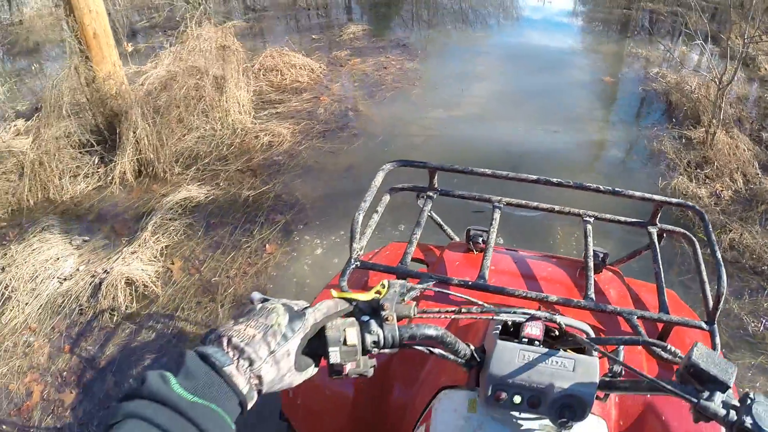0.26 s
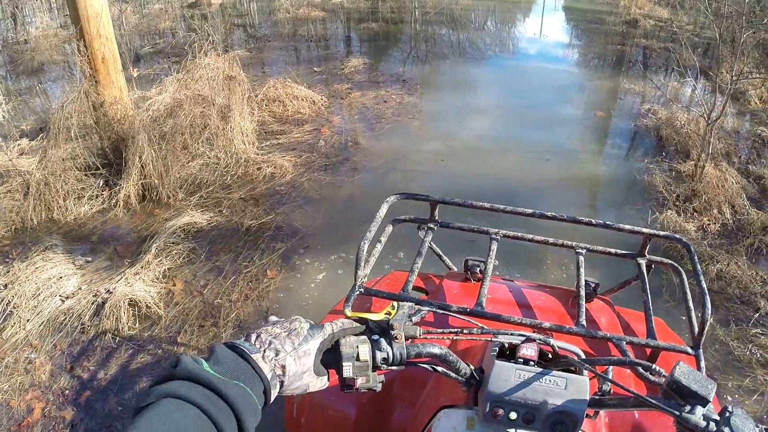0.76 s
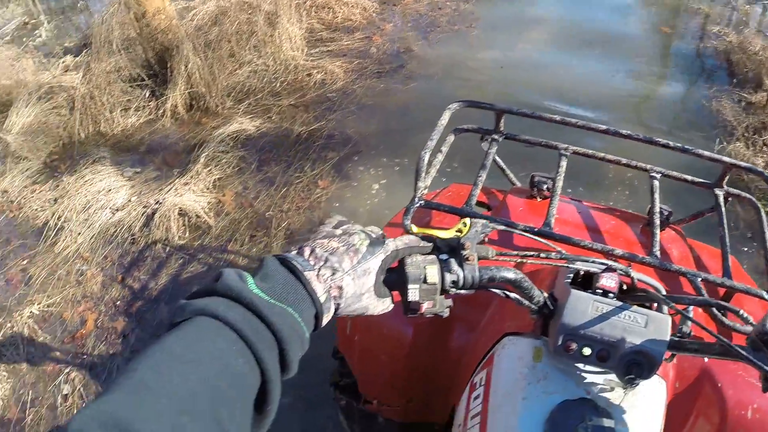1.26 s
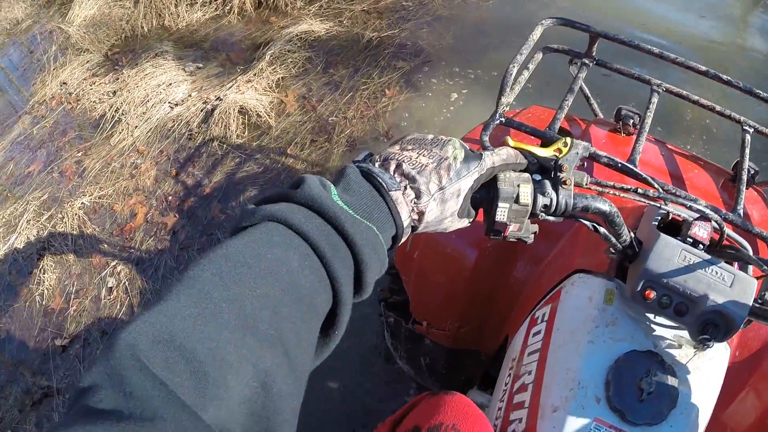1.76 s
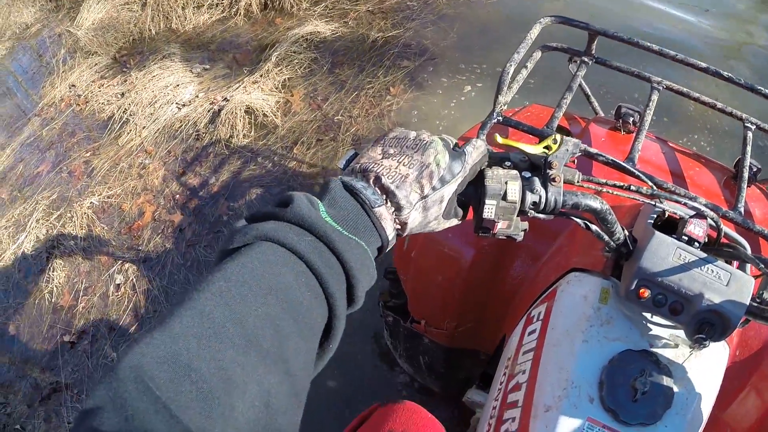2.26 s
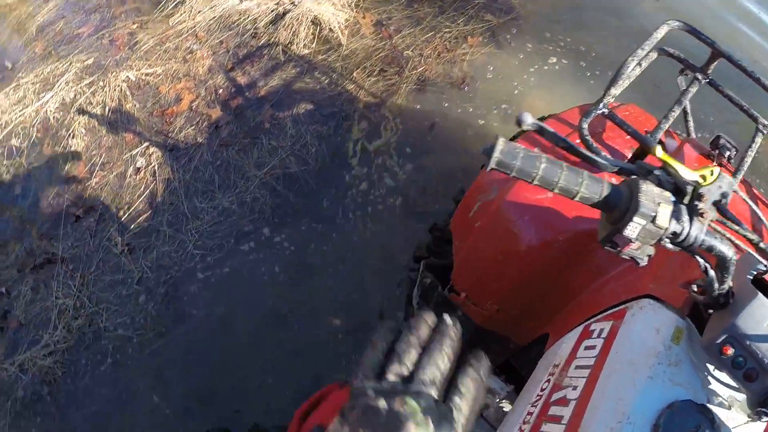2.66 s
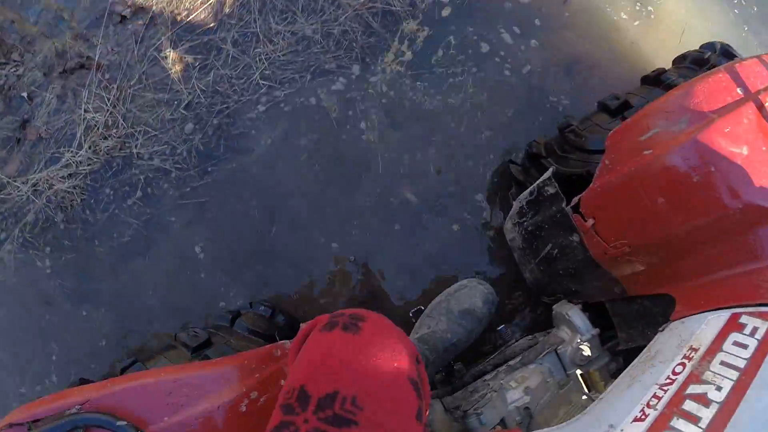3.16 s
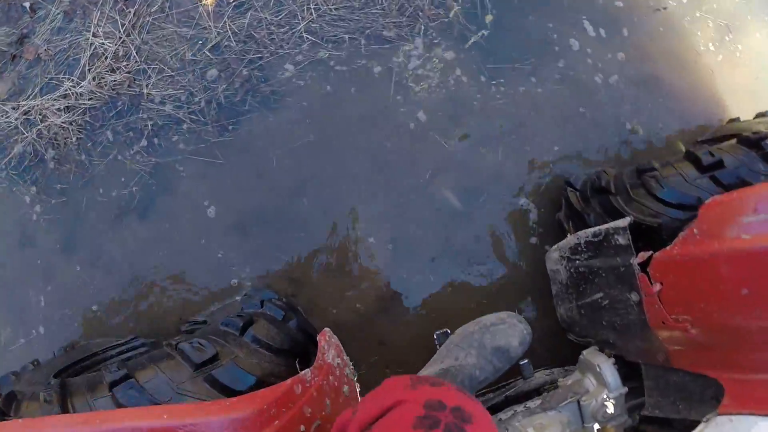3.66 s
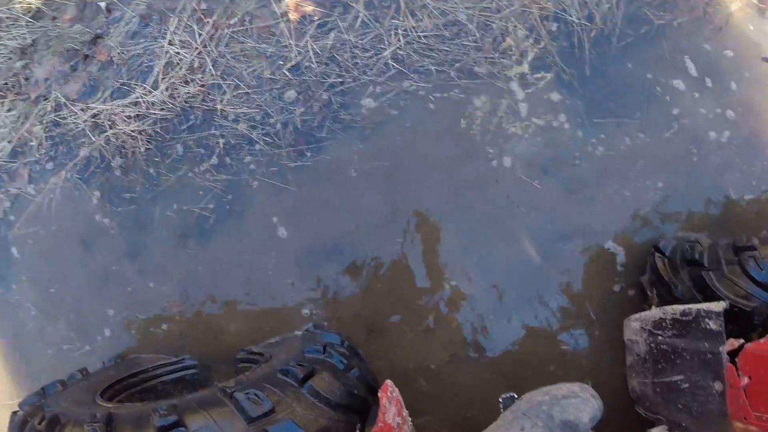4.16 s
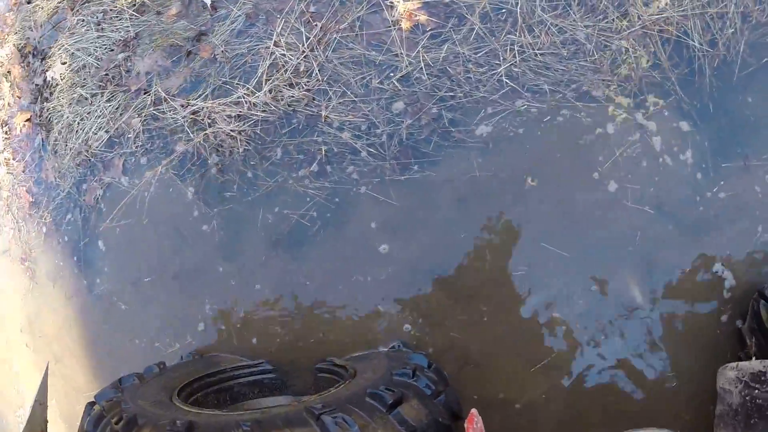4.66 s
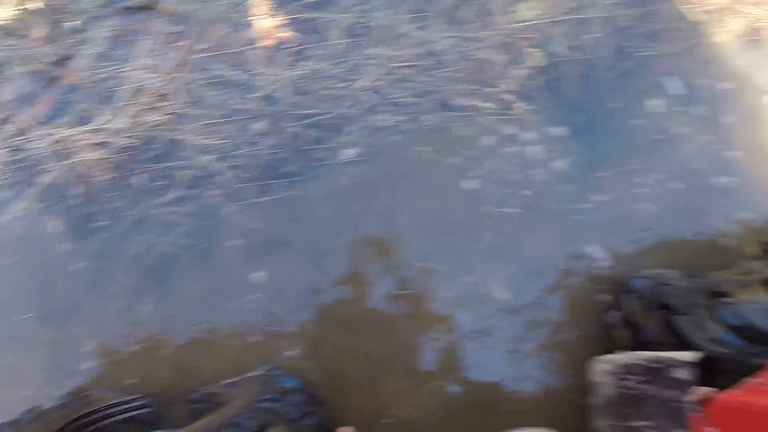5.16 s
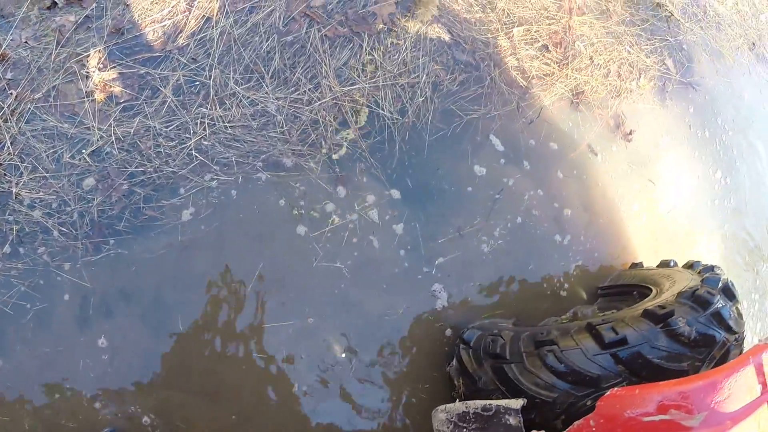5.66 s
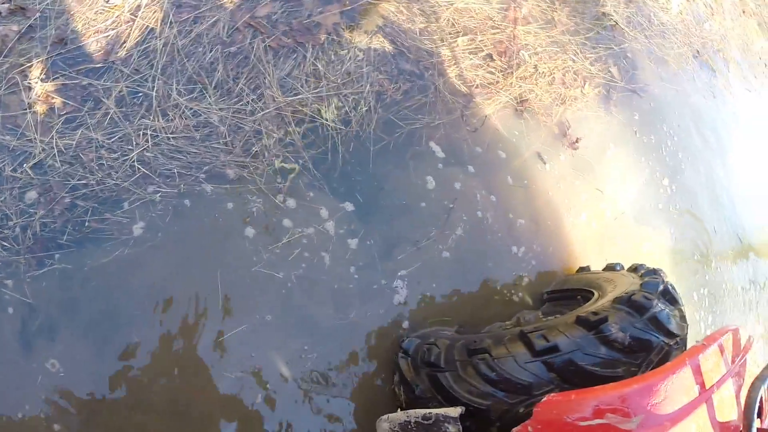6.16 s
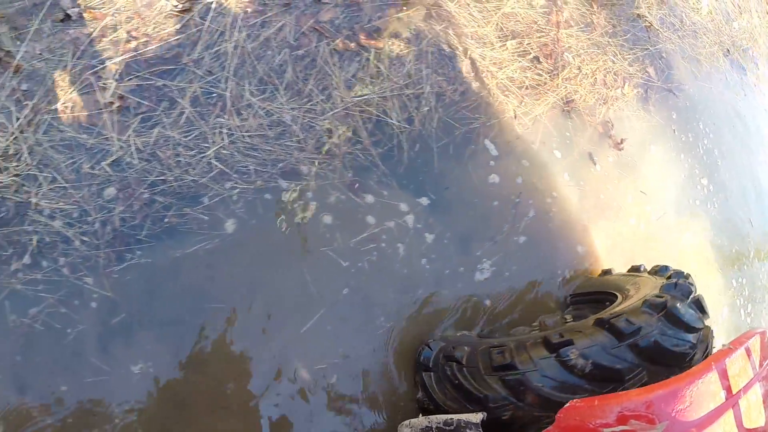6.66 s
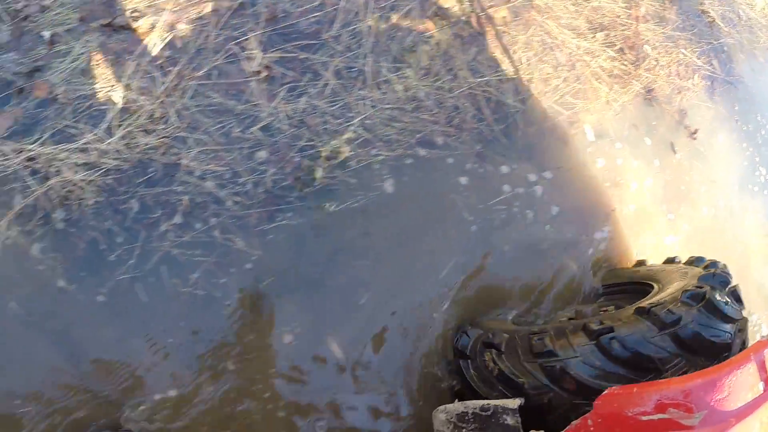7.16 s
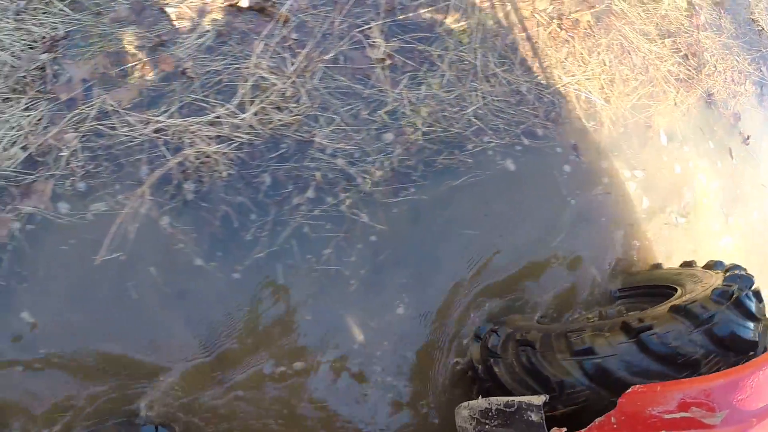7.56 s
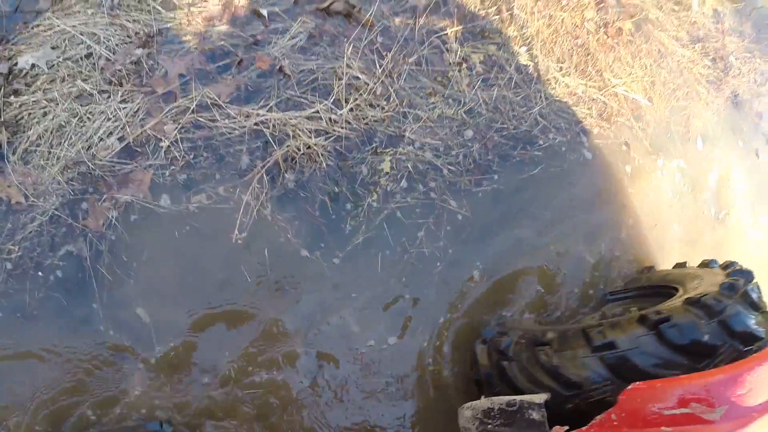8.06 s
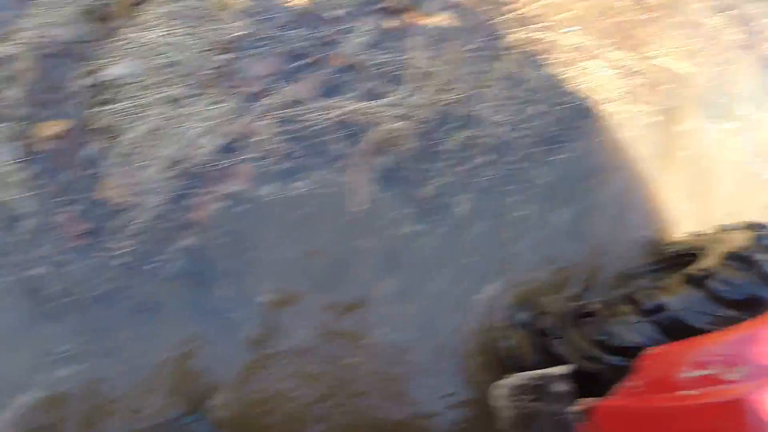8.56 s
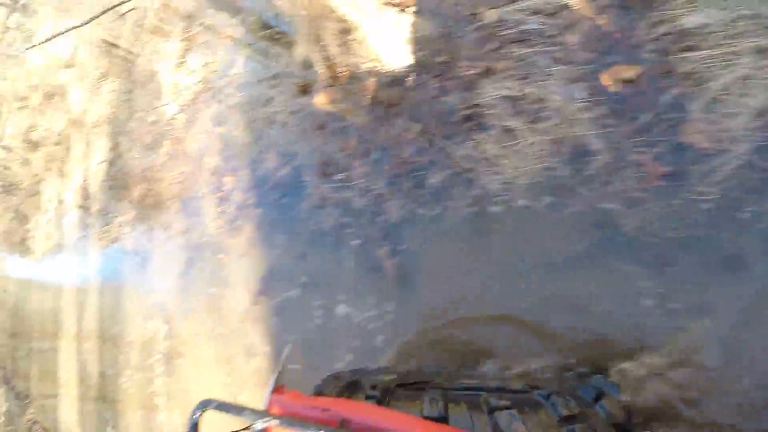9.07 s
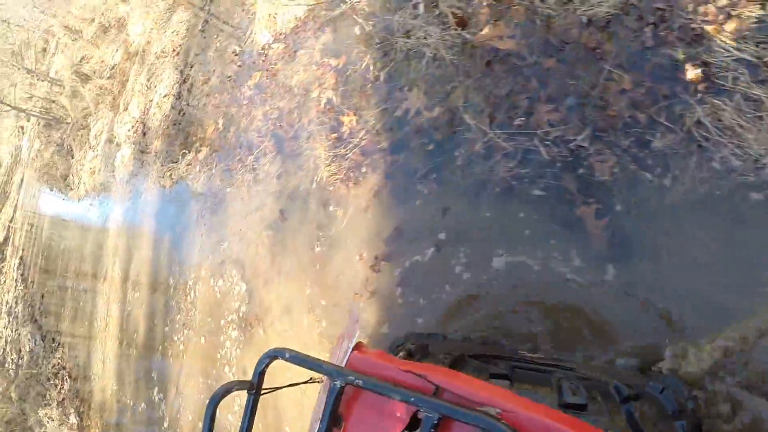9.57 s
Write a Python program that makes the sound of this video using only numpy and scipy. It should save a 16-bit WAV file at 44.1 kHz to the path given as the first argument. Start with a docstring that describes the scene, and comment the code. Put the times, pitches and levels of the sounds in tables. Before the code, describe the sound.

A quad bike engine idles close by with an uneven thump, then picks up on a little throttle as the tyres stir shallow water.

```python
"""The thump of an idling quad bike, close up, from a microphone on the rider's helmet on a flooded trail.
The single-cylinder four-stroke creeps along with the odd weak firing, then pulls on a little throttle.
Each firing rings the silencer and rattles the casing. Engine speed sets the throttle and lifts the
level; the lean of the rider's head sets which parts are heard best. Below, the tyres stir the water;
a lever clicks on the handlebar and air puffs at the microphone."""
import sys
import numpy as np
from scipy import signal
from scipy.fft import rfft, irfft, next_fast_len
from scipy.io import wavfile
from scipy.ndimage import uniform_filter1d

SR = 44100
rng = np.random.default_rng(int(sys.argv[2]) if len(sys.argv) > 2 else 0)


def transcribe(signal):
    """Save signal, clipped to [-1, 1], as a 16-bit WAV file at the path in sys.argv[1]."""
    frames = np.atleast_2d(signal).T
    limited = np.clip(frames, -1, 1)
    pcm = np.round(limited * 32767).astype(np.int16)
    wavfile.write(sys.argv[1], SR, pcm)


N = 433062
TIME = np.arange(N) / SR
FFT_SIZE = 2 * next_fast_len(N // 2 + SR // 4, True)
FREQ = np.maximum(np.arange(FFT_SIZE // 2 + 1) * SR / FFT_SIZE, 1e-3)


# exhaust resonances, the pipe first, then the silencer chambers: f/Hz, width/Hz, gain/dB
EXHAUST_MODES = [(79.3, 65, -3.5), (183.3, 32.9, 10.5), (208.9, 29.7, 8.5), (307.4, 77, 6.5),
                 (369, 47.7, 17.5)]

def exhaust(age, strength, edge, lead_s=.0016, slap_db=-19):
    """A gas puff at each firing, steeper on throttle, rings the silencer; water and banks slap it back."""
    puff = strength * swell(age + lead_s, .00167 - .00038 * edge, .00173 - .00062 * edge)
    puff *= np.minimum(TIME / .0035, 1)
    pipe, *chambers = (undb(db) * resonance(hz, width) for hz, width, db in EXHAUST_MODES)
    body = pipe - sum(chambers)  # the pipe swings against the chambers
    low_cut = FREQ / (FREQ - 60j)
    echoes = sum(np.exp(-2j * np.pi * FREQ * delay_s) for delay_s in (.0215, .0305))
    dull_slap = undb(slap_db) * echoes / (1 + 1j * FREQ / 220)
    return through(puff, body * low_cut * (1 + dull_slap))


# silencer outlet, from the helmet: f/Hz, width/Hz, gain/dB in head pose 0, 1, 2, 3
OUTLET_MODES = [(690, 100, -2, 3, -9, 2), (860, 110, -4, -3, -1, -7), (1190, 140, -3, -4, 1.5, 0),
                (1430, 220, -6, -7, -4, -5)]

def bark(cycle, age, strength, edge, rasp_db=-24, crack_db=3, edge_db=11):
    """Under load the gas cracks as it leaves and on the backswing, with a rasp; all ring the outlet."""
    force = strength * undb(crack_db + edge_db * (edge - 1)) * per_cycle(cycle, 1.5)
    fronts = .22 * swell(age + .0012, .0001, .00012) + .16 * swell(age - .0022, .0001, .00012)
    rasp = undb(rasp_db) * swell(age - .002, .00075, .0041) * noise()
    crack = force * (fronts + rasp)
    return sum(by_pose(undb(db)) * through(crack, resonance(hz, width)) for hz, width, *db in OUTLET_MODES)


# weak firings: t/s, level/dB against a full one
WEAK_FIRINGS = [(.416, -22), (1.043, -3), (1.309, -13), (1.495, -3), (1.773, -2.5), (2.237, -8.5),
                (2.614, -3), (3.006, -4.5), (3.208, -9), (3.412, -7.5), (4.207, -10.5), (5.299, -5.5),
                (5.645, -5.5), (5.819, -8.5), (9.275, -3), (9.479, -3.5)]

def combustion(cycle, throttle, throttle_db=3.5):
    """Strength of each firing: greater on throttle, with the odd weak burn."""
    burn_db = np.zeros(cycle.max() + 1)
    for s, db in WEAK_FIRINGS:
        burn_db[cycle[int(s * SR)]] = db
    return undb(throttle_db * throttle + burn_db[cycle]) * per_cycle(cycle, .3)


# engine speed: t/s, firing rate/Hz
FIRING_RATE = [(0.0, 12.62), (0.84, 10.71), (1.03, 11.35), (1.88, 10.45), (2.08, 11.1), (3.1, 9.75),
               (3.69, 10.45), (3.91, 9.54), (5.09, 11.63), (5.87, 11.47), (6.1, 15.43), (6.78, 16.1),
               (7.82, 13.84), (8.16, 14.4), (8.47, 16.74), (9.07, 16.92), (9.63, 12.96), (9.82, 14.43)]

def crank():
    """For each sample: the nearest firing's number, the phase around it in cycles, and the firing rate."""
    rate, = curves(FIRING_RATE)
    elapsed = np.cumsum(rate) / SR - .048
    cycle = np.round(elapsed).astype(int)
    return cycle, elapsed - cycle, rate


def throttle_for(rate, shut_hz=9.14, open_hz=16.6, lead_s=.095):
    """Throttle 0-1: more to hold a higher firing rate, more still to gain speed."""
    acceleration = uniform_filter1d(np.gradient(rate) * SR, size=SR // 5)
    return np.clip((rate + lead_s * acceleration - shut_hz) / (open_hz - shut_hz), 0, 1)


def airbox(cycle, age, db=-43):
    """The intake knocks hollowly at each beat, heard only while the rider faces ahead."""
    facing = np.clip(1 - 3 * curves(HEAD_POSE)[0], 0, 1)
    gulp = swell(age - .004, .0016, .012) * per_cycle(cycle, 1.5) * (np.abs(age) < .04)
    hz = 380 * per_cycle(cycle, .29)
    return undb(db) * facing * gulp * np.cos(2 * np.pi * hz * (age - .0015))


# casing and cooling fins, below the rider: f/Hz, width/Hz, relative level/dB in head pose 0, 1, 2, 3
CASING_MODES = [(590, 720, -3, -3.5, -8, -1), (861, 124, -9, -4.5, -5.5, -16),
                (1157, 205, -3.5, -5.5, 1.5, -7), (1390, 260, -15, -4.5, 5, 0.5),
                (1690, 210, -2, -1.5, 0.5, -2), (2040, 220, -10, -8, -6, 2),
                (2580, 224, -11.5, -16, 3.5, 0.5), (2900, 380, -6, -8, -2.5, -1.5),
                (3580, 600, -6, -8.5, -2, -3), (3984, 88, -5, -7.5, -4, 0),
                (4374, 190, -7.5, -5.5, -2.5, -3.5), (4734, 290, 1, -4.5, 3, 2),
                (5320, 95, -18, -10, -3.5, -21), (5540, 180, -9.5, -4, -23, 4), (5760, 46, -1, 5, 4.5, 5),
                (5895, 89, -2, -5, -0.5, -12), (6205, 95, -7, -6, 2, -12), (6770, 470, -9.5, -8.5, 0, -7.5),
                (7575, 600, -13.5, -14.5, -5.5, -14), (8916, 430, -18, -15.5, -6.5, -9.5),
                (10050, 780, -18.5, -27, -17, -15.5), (12200, 2100, -29, -43, -25, -33)]
# valve gear taps: phase/cycles, relative level/dB
VALVE_TAPS = [(.21, -3.5), (.33, -6), (.57, -12), (.75, -2), (0.859, -3.5)]

def casing(cycle, phase, rate, whirr=.2, tap_share=.33, grain_db=1.5):
    """Piston slap swells round each firing over the whirr of chain and gears; valve taps fall between."""
    slap = swell(phase / rate - .001, .0041, .0079) * per_cycle(cycle, 1.8)
    valves = sum(undb(db) * taps(phase, rate, at, .018) * per_cycle(cycle, 1.95) for at, db in VALVE_TAPS)
    shaking = (whirr + slap + tap_share * valves) * undb(grain_db * walk(700)) * noise()
    mode_powers = np.array([peak(hz, width) ** 2 for hz, width, *_ in CASING_MODES])
    pose_powers = undb(np.array(CASING_MODES)[:, 2:].T) ** 2 @ mode_powers
    sounds = [unit(through(shaking, np.sqrt(power))) for power in pose_powers]
    pose = by_pose(np.arange(len(sounds)))
    return sum(np.clip(1 - np.abs(pose - k), 0, 1) * sound for k, sound in enumerate(sounds))


def valve_train(cycle, phase, rate, tappet_gain, chain_gain, opens=.8, shuts=.32):
    """A tappet ticks high up as its valve opens and shuts; the slack cam chain rattles at every tap."""
    tick = taps(phase, rate, opens, .0044) + .53 * taps(phase, rate, shuts, .0067)
    tick *= per_cycle(cycle, 3.5)
    rattle = sum(undb(db) * taps(phase, rate, at, .0075) for at, db in VALVE_TAPS) * per_cycle(cycle, 1.6)
    tappet_ring = shaped_noise(peak(8600, 200) + .86 * peak(9530, 500) + .25 * peak(10200, 900))
    chain_ring = shaped_noise(peak(1709, 120) + .5 * peak(1930, 280))
    return tappet_gain * tick * tappet_ring + chain_gain * rattle * chain_ring


def frame_rumble(clatter_gain, relative_db=-2):
    """Frame and mudguards rumble along with the engine."""
    return clatter_gain * undb(relative_db) * shaped_noise(resonance(163, 250) * resonance(155, 450))


# two bands that glide at the helmet as the head turns: t/s, growl f/Hz, whirr f/Hz
GLIDING_BANDS = [(8.1, 600, 2590), (8.55, 637, 2670), (9.3, 745, 2300), (9.6, 694, 1990)]

def gliding_bands(roughness_hz=150, growl_db=-4):
    """A rough growl rises and a whirr falls as the rider's head turns."""
    growl_hz, whirr_hz = curves(GLIDING_BANDS)
    growl = walk(roughness_hz) * np.sin(2 * np.pi * np.cumsum(growl_hz) / SR)
    whirr = walk(3 * roughness_hz) * np.sin(2 * np.pi * np.cumsum(whirr_hz + 90 * walk(90)) / SR)
    return undb(growl_db) * unit(growl) + unit(whirr)


def sprocket_ring(age):
    """A sprocket rings on, tugged by each firing."""
    tugs = noise() * (.3 + swell(age, .0023, .0063))
    return unit(through(tugs, peak(5797, 210)))


# wash down at the tyres, growing as the bike wades in: t/s, level/dB with the throttle shut
WASH_LEVEL = [(3, -64), (6.6, -63), (9.3, -62)]
# its spectrum: f/Hz, relative level/dB
WASH_SPECTRUM = [(200, -6), (600, -10), (1500, -3), (3000, -8), (6000, -14), (12000, -24.5)]
# plops at the wheel: t/s, starting f/Hz, level/dB
WHEEL_PLOPS = [(7.539, 1340, -44), (8.495, 1480, -35)]

def water(throttle, count=2500, bubble_db=-5, surge_db=1.5, force_db=16, churn_db=3.5):
    """The tyre lugs churn a surging wash full of small bubbles, louder on throttle, with two plops."""
    bubbles, plops = np.zeros(N), np.zeros(N)
    for when, pitch, ring, force in rng.random((count, 4)):
        add(bubbles, when * N / SR, undb(force_db * force ** 2) * bubble(600 * 8 ** pitch, 6 + 10 * ring))
    for s, hz, db in WHEEL_PLOPS:
        add(plops, s, undb(db) * bubble(hz, cycles=43))
    wash = unit(through(noise() * undb(surge_db * walk(15)), colour(WASH_SPECTRUM)))
    gain = undb(curves(WASH_LEVEL)[0] + churn_db * throttle)
    return gain * (wash + undb(bubble_db) * unit(bubbles)) + plops


def bubble(hz, cycles):
    """A bubble rings briefly, rising in pitch as it nears the surface."""
    samples = SR * cycles / hz
    life = np.arange(int(samples) + 2) / samples
    return np.sin(2 * np.pi * cycles * (life + .094 * life ** 2)) * np.exp(-np.log(300) * life)


# handlebar lever and fittings, at arm's length: t/s, contact level/dB, decay/s, treble edge f/Hz
LEVER_CLICKS = [(1.564, -42, 0.0027, 2800), (1.875, -36.5, 0.0042, 3200), (1.881, -36.5, 0.0077, 3180),
                (1.895, -45, 0.011, 4000), (1.904, -55, .006, 4000), (1.909, -46, .007, 4000),
                (2.025, -49, .004, 14000), (2.835, -44.5, 0.0018, 8000), (9.56, -51, 0.0028, 16000)]
# the lever's resonances: f/Hz, width/Hz, relative level/dB
LEVER_MODES = [(2030, 220, 3), (2900, 280, -1), (3430, 590, 1), (4280, 110, 6.5), (4590, 150, 9),
               (5900, 1800, -6), (7680, 90, 10.5), (10400, 68, 5), (12000, 48, -8), (15040, 200, -19)]

def lever(snap_at_s=2.459, snap_length_s=.0035, snap_db=-32):
    """Gritty contacts, soft and hard, ring the metal lever; let go, it snaps home with a hard chatter."""
    contacts, age = np.zeros(N), TIME[:SR // 10]
    for s, db, decay_s, edge_hz in LEVER_CLICKS:
        grit = signal.lfilter(*signal.butter(1, edge_hz, fs=SR), rng.standard_normal(len(age)))
        add(contacts, s, undb(db) * np.exp(-age / decay_s) * grit)
    ring = sum(undb(db) * resonance(hz, width) for hz, width, db in LEVER_MODES)
    clicks = through(contacts, unit(ring))
    chatter = noise() * (TIME > snap_at_s) * (TIME < snap_at_s + snap_length_s)
    snap = through(chatter, ring * resonance(7000, 9000))
    snap /= np.sqrt(np.sum(snap ** 2) / (2 * snap_length_s * SR))
    return clicks + undb(snap_db) * snap


# gusts right on the microphone: t/s, level/dB, half length/s
MIC_GUSTS = [(.27, -39.5, 0.18), (1.4, -46.5, 0.21), (2.2, -48, 0.51), (5.3, -53.5, 0.17), (8.75, -50, .1),
             (9.779, -46.5, 0.38)]
# spectrum of the eddies: f/Hz, relative level/dB
EDDY_SPECTRUM = [(4, -30), (12, 5.5), (25, -6), (50, -8), (100, -15), (300, -26), (1000, -68)]

def buffet(breeze_db=-51.5):
    """Slow eddies of air at the microphone, with a few gusts."""
    power = undb(breeze_db) ** 2 + sum(hump(*gust) ** 2 for gust in MIC_GUSTS)
    return np.sqrt(power) * shaped_noise(colour(EDDY_SPECTRUM))


# fine hiss at the helmet: f/Hz, relative level/dB
HISS_SPECTRUM = [(3000, -22), (6800, 6), (8200, -7), (9000, 1), (10200, -5), (12000, -28)]

def hiss():
    """A fine hiss swells briefly as the head swings forward."""
    return hump(s=8.76, db=-59.5, half_s=.3) * shaped_noise(colour(HISS_SPECTRUM))


def whine(hz=13906, db=-79, duty=.67):
    """A faint electronic whine behind everything, interrupted sixty times a second."""
    gate = uniform_filter1d(1. * (60 * TIME % 1 < duty), size=90)
    return undb(db) * unit(np.sin(2 * np.pi * hz * TIME) * gate)


# microphone position: t/s, head pose (0 facing ahead, 1 beside the engine, 2 leaning low,
# 3 and up turned over the front wheel)
HEAD_POSE = [(2.6, 0), (3.45, 1.18), (4.4, 1), (6.1, 2), (8, 1.6), (8.4, 1.5), (8.7, 2.24), (9.25, 3.5)]

def by_pose(values):
    """Blend one value per pose as the head carries the microphone about."""
    return np.interp(curves(HEAD_POSE)[0], np.arange(len(values)), values)


def per_cycle(cycle, spread_db):
    """A factor drawn afresh for every engine cycle."""
    return undb(spread_db * rng.standard_normal(cycle.max() + 1))[cycle]


def taps(phase, rate, at, decay_s):
    """Envelope of a tap that comes once a cycle."""
    return np.exp(-((phase - at) % 1) / rate / decay_s)


def swell(age, rise_s, fall_s):
    """A rounded rise and decay around age 0."""
    return np.exp(-np.logaddexp(-age / rise_s, age / fall_s))


def hump(s, db, half_s):
    """A bell curve of gain around a time."""
    return undb(db) * np.exp(-((TIME - s) / half_s) ** 2)


def curves(table):
    """Each column of a table as a line through time."""
    s, *columns = np.transpose(table)
    return [np.interp(TIME, s, column) for column in columns]


def walk(rate):
    """Random levels held 1 / rate s and slewed; spread near 1."""
    hold = int(SR / rate)
    return 1.1 * uniform_filter1d(np.repeat(rng.standard_normal(N // hold + 1), hold)[:N], hold)


def noise():
    """White noise."""
    return rng.standard_normal(N)


def shaped_noise(response):
    """Filtered noise at rms 1."""
    return unit(through(noise(), response))


def through(x, response):
    """Filter by a frequency response."""
    return irfft(rfft(x, FFT_SIZE) * response, FFT_SIZE)[:N]


def resonance(hz, width_hz):
    """Response of one damped resonance, gain 1 at its centre."""
    return 1 / (1 + 1j * (FREQ / hz - hz / FREQ) * hz / width_hz)


def peak(hz, width_hz):
    """Squared magnitude of a resonance."""
    return np.abs(resonance(hz, width_hz)) ** 2


def colour(points):
    """Response through (f/Hz, level/dB) points."""
    hz, db = np.transpose(points)
    return undb(np.interp(np.log(FREQ), np.log(hz), db))


def add(out, s, sound):
    """Mix a sound in at a time."""
    start = int(s * SR)
    out[start:start + len(sound)] += sound[:max(N - start, 0)]


def undb(db):
    """Decibels to gain."""
    return 10 ** (np.asarray(db) / 20)


def unit(x):
    """Scale to rms 1."""
    return x / np.sqrt(np.mean(np.abs(x) ** 2))


# what reaches the helmet, one row per head pose, before speed and throttle act:
# puff edge (0-1), then gain/dB of exhaust, casing, tappet, cam chain, gliding bands, sprocket
POSE_BALANCE = [(0.01, -18, -61, -74, -71.5, -79.5, -90), (0.42, -17.5, -57, -63.5, -52.5, -78, -69),
                (.68, -17.5, -57, -70, -61, -80, -68.5), (0.44, -18, -59.5, -64.5, -57, -71, -67.5)]

def scene(idle_hz=11.12, clatter_rise_db=9, bands_rise_db=16.5, sprocket_rise_db=14.5):
    """Engine, water and small noises, all close to one microphone on the helmet."""
    cycle, phase, rate = crank()
    age = phase / rate  # seconds from the nearest firing
    throttle = throttle_for(rate)
    doublings = np.log2(rate / idle_hz)  # each rise is per doubling of engine speed
    pose_edges, *parts_db = np.transpose(POSE_BALANCE)
    pipe, clatter, tappet, chain, bands, sprocket = (by_pose(undb(db)) for db in parts_db)
    clatter *= undb(clatter_rise_db * doublings)
    bands *= undb(bands_rise_db * doublings)
    sprocket *= undb(sprocket_rise_db * doublings)
    edge = np.clip(by_pose(pose_edges) + .24 * throttle, 0, 1)
    strength = pipe * combustion(cycle, throttle)
    gas = exhaust(age, strength, edge) + bark(cycle, age, strength, edge) + airbox(cycle, age)
    metal = clatter * casing(cycle, phase, rate) + valve_train(cycle, phase, rate, tappet, chain)
    bike = gas + metal + frame_rumble(clatter) + bands * gliding_bands() + sprocket * sprocket_ring(age)
    return (bike + water(throttle) + hiss() + lever() + buffet() + whine())[None]


def record(dry):
    """The recorder cuts the treble above 14.9 kHz."""
    return signal.sosfilt(signal.ellip(8, .2, 70, 14900, fs=SR, output="sos"), dry)


dry = scene()
out = record(dry)
transcribe(out)
```